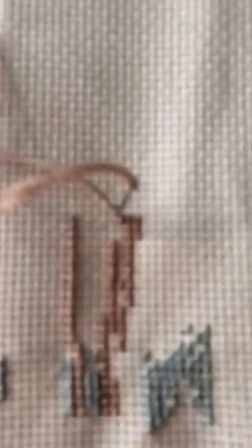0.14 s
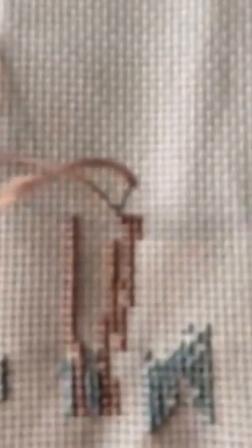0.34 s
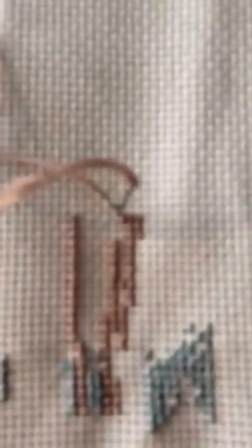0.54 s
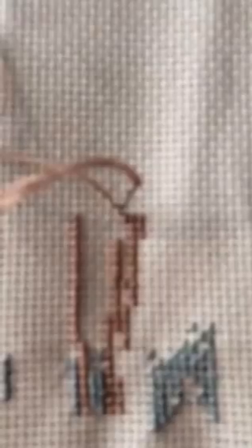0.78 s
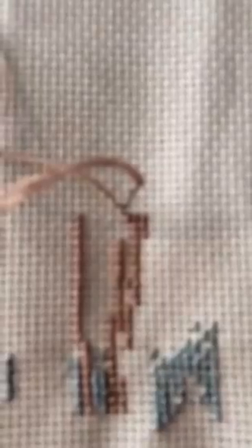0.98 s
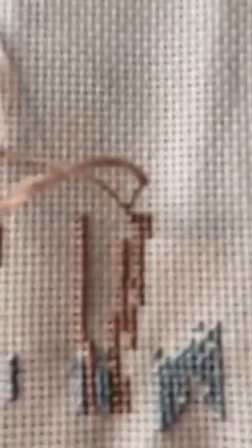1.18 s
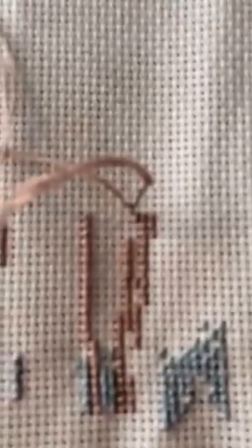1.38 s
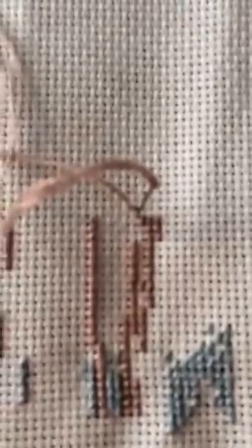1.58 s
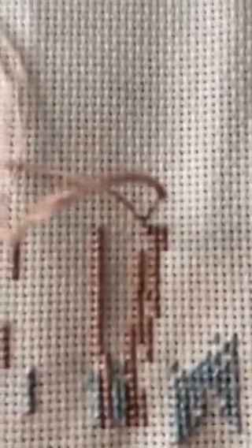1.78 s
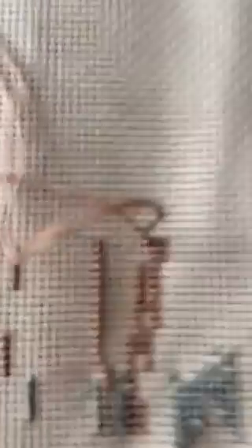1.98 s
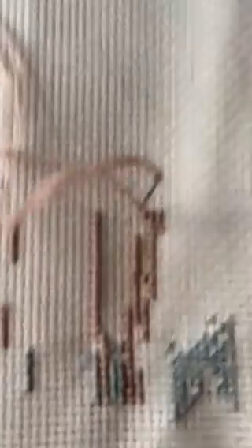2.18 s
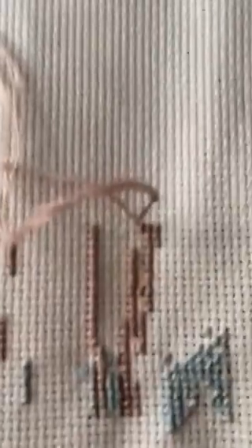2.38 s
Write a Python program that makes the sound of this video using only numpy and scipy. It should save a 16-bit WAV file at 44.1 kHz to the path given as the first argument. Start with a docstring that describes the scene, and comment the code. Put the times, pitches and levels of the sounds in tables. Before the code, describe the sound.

Close to the microphone, embroidery thread is tugged through taut cloth: near-silence, then one loud sharp snap with a very short crackly rasp, a quick small-room echo, and quiet hiss and low rumble again.

```python
"""A quiet room where embroidery floss is tugged through taut cloth, close by.
A faint rustle swells just before the snap of the thread, which snags again as it rasps through the weave:
clicks and bursts of noise make the snags, and uneven slips make the rasp, for under a tenth of a second.
Fading tones are the ringing cloth and frame; a soft low bump is the cloth settling; a light tap, thread
brushes and a short room echo join in, over filtered noise for hiss and rumble and a faint appliance hum."""
import sys
import numpy as np
from scipy import signal
from scipy.fft import rfft, irfft
from scipy.io import wavfile

SR = 44100
rng = np.random.default_rng(int(sys.argv[2]) if len(sys.argv) > 2 else 0)


def dump(signal):
    """Clip the signal to [-1, 1] and save it as 16-bit WAV at the path in sys.argv[1]."""
    limited = np.clip(np.atleast_2d(signal).T, -1, 1)
    pcm = np.round(limited * 32767).astype(np.int16)
    wavfile.write(sys.argv[1], SR, pcm)


N = 107339  # length of the scene in samples

# moments when the thread snags and lets go, the first being the break-free snap; relative levels:
# [t/s, crack level/dB, fizz level/dB, ring level/dB, scatter decay/s]
SNAGS = [(1.9312, -1, -11, 3, 0.0025), (1.9419, -7.5, 0.5, -18.5, 0.0003),
         (1.9476, -23, -17.5, -26.5, .002), (1.9558, -18, -6, -22, .0015),
         (1.9665, -36.5, -18.5, -35.5, 0.0016), (1.9709, -18, -13, -31.5, .0005),
         (1.9735, -30, -19, -26.5, 0.0009), (1.987, -14.5, -13.5, -35.5, 0.00067),
         (2.0037, -16, -30.5, -17.5, 0.0015), (2.0056, -34, -26, -17.5, 0.0012)]


def undb(db):
    """Turn decibels into a gain."""
    return 10 ** (np.asarray(db) / 20)


def unit(x):
    """Scale a sound to an rms (average strength) of 1."""
    return x / np.sqrt(np.mean(x ** 2))


def band(x, lo_hz, hi_hz, order=2):
    """Keep mainly the frequencies between two limits."""
    edges_hz = [lo_hz, min(hi_hz, SR / 2 - 20)]
    return signal.sosfilt(signal.butter(order, edges_hz, "band", fs=SR, output="sos"), x)


def high_pass(x, hz, order=2):
    """Cut the bass."""
    return signal.sosfilt(signal.butter(order, hz, "high", fs=SR, output="sos"), x)


def colour(points, size=4096):
    """Turn a curve of [f/Hz, level/dB] into an impulse response that starts at once."""
    hz, db = np.array(points, float).T
    bins_hz = np.arange(size // 2 + 1) * SR / size
    gain = undb(np.interp(np.log(bins_hz + 1), np.log(hz), db))
    # folding the cepstrum gives minimum phase: nothing sounds before the click
    cepstrum = irfft(np.log(gain))
    cepstrum[1:size // 2] *= 2
    cepstrum[size // 2 + 1:] = 0
    return irfft(np.exp(rfft(cepstrum)))


def through(x, response):
    """Pass a sound through an impulse response."""
    return signal.fftconvolve(x, response)[:len(x)]


def impulse(s):
    """A single click at a given time in seconds."""
    return 1. * (np.arange(N) == int(s * SR))


def snags(t):
    """Each snag lets go with a crack and a brief fizz of fibres, and sets the cloth and frame ringing."""
    # colour of a snag's crack: [f/Hz, relative level/dB]
    crack_curve = [(150, -18.5), (400, -12.5), (900, -3), (2000, -0.5), (2700, -2), (3400, -4),
                   (4300, -6.5), (5200, -0.5), (6800, 3.5), (8000, -3), (10200, -1.5), (13000, -26),
                   (15500, -17.5)]
    crack_gain_db, scatter_db = 5.5, -11
    crack, fizz, push = np.zeros((3, N))
    for s, crack_db, fizz_db, ring_db, decay_s in SNAGS:
        scatter = rng.standard_normal(N) * (t > s) * np.exp(-np.abs(t - s) / decay_s)
        release = impulse(s) + undb(scatter_db) * scatter
        crack += undb(crack_db) * release
        fizz += undb(fizz_db) * release
        push += undb(ring_db) * impulse(s)
    cracks = through(crack, colour(crack_curve))
    flicks = band(fizz, 8700, 11800)  # tiny fibres that flick free
    return undb(crack_gain_db) * (cracks + flicks) + through(push, ringing(rubbed=False))


def rasp(t):
    """Dense uneven slips of thread against weave drive the cloth; a faint noise swells up to the snap."""
    # loudness of the rasp over time, relative to the range levels below:
    # [t/s, low level/dB, lower middle level/dB, upper middle level/dB, treble level/dB]
    rasp_levels = [(1.941, -25, -23.5, -34.0, -28), (1.9445, -29, -21.5, -26.5, -25.5),
                   (1.948, -37.5, -26.5, -28, -27), (1.953, -26.5, -29.0, -38.5, -43.5),
                   (1.956, -30.5, -31.5, -28.5, -25.5), (1.9641, -33.5, -37.5, -37.0, -38),
                   (1.968, -30, -40.5, -35, -35), (1.972, -34.5, -31, -32.0, -27.5),
                   (1.977, -28.5, -31.0, -27.5, -29.5), (1.983, -29.0, -35.0, -41, -43.5),
                   (1.9883, -38, -33, -28.0, -34.5), (1.997, -40, -30.5, -24, -32),
                   (2.002, -47.5, -32.5, -33.5, -31.5), (2.007, -44.5, -34, -25, -43.5),
                   (2.012, -40, -33, -48.5, -40)]
    # those four frequency ranges: [lowest f/Hz, highest f/Hz]
    ranges_hz = [(430, 1500), (1300, 2400), (2400, 4800), (5200, 15500)]
    # overall level of each range: [level/dB]
    range_levels_db = [1.1, 1.9, 2.1, -.5]
    # colour of the rubbing fibres: [f/Hz, relative level/dB]
    fibre_curve = [(300, -0.5), (800, 5), (2200, 8.5), (4000, -4), (6500, 2), (7800, 1), (9600, 7),
                   (11400, 0), (13200, -15), (15200, -3.5)]
    slips_per_s, slip_spread_db, fuzz_db = 1700, 6, -9.5
    attack_s, release_s = .005, .006  # time for 30 dB
    swell_s, swell_db, swell_rise_db_per_s = 1.9, -61.5, 300.5  # start, first level and rise

    is_slip = rng.random(N) < slips_per_s / SR
    slip_gain = undb(slip_spread_db * np.clip(rng.standard_normal(N), -2, 2))
    slips = is_slip * slip_gain * rng.choice([-1, 1], N)
    friction = unit(unit(slips) + undb(fuzz_db) * rng.standard_normal(N))

    body, fibres = ringing(rubbed=True), colour(fibre_curve)
    body[:len(fibres)] += fibres

    times, *levels = np.array(rasp_levels).T
    before = np.maximum(times[0] - t, 0) / attack_s
    after = np.maximum(t - times[-1], 0) / release_s
    edges_db = -30 * (before + after)
    out = np.zeros(N)
    for (lo, hi), db, range_level_db in zip(ranges_hz, levels, range_levels_db):
        part = band(body, lo, hi, order=3)
        loudness = undb(np.interp(t, times, db) + edges_db + range_level_db)
        out += through(friction * loudness, part / np.linalg.norm(part))

    snap_s = SNAGS[0][0]
    swell_age_s = np.clip(t, swell_s, snap_s) - swell_s
    swell = (t > swell_s) * (t < snap_s) * undb(swell_db + swell_rise_db_per_s * swell_age_s)
    soft_body = band(body, 700, 9000)
    return out + through(friction * swell, soft_body / np.linalg.norm(soft_body))


def ringing(rubbed):
    """Response of cloth and frame: fading tones, with neighbours swinging in opposite directions."""
    # ringing tones (modes) of cloth and frame; t60 is the time to fade by 60 dB; relative levels:
    # [f/Hz, t60/s, level when snapped/dB, level when rubbed/dB]
    modes = [(922.5, 0.082, -24.5, -24.5), (1427, 0.06, -30, -39), (1702, 0.039, -33, -30),
             (1994, 0.064, -21.5, -38), (2676, .025, -32.5, -29.5), (2817, .03, -35.5, -26),
             (3110, 0.032, -35, -23), (3247, 0.025, -16, -23.5), (4310, 0.015, -17, -23.5),
             (4601, .025, -24, -28), (6208, 0.038, -11, -30.5), (6720, 0.013, -8.5, -30),
             (193, 0.18, -39, -50.5)]
    t = np.arange(SR // 4) / SR
    out = np.zeros(len(t))
    for k, (hz, t60, snap_db, rub_db) in enumerate(modes):
        gain = (-1) ** k * undb(rub_db if rubbed else snap_db)
        out += gain * np.sin(2 * np.pi * hz * t) * np.exp(-np.log(1000) * t / t60)
    return out


def handling(t):
    """The cloth settles with a low bump; thread brushes it and the frame is tapped lightly."""
    # faint brushes of thread over the cloth, each swelling and fading around its time:
    # [t/s, half-width/s, f/Hz, level/dB]
    brushes = [(0.076, 0.037, 6300, -76.5), (0.51, 0.067, 2200, -79), (2.372, 0.059, 7300, -76),
               (2.33, 0.18, 2800, -78)]
    bump_s, bump_width_s, bump_hz, bump_db = 2.03, .03, 52, -51
    tap_s, tap_decay_s, tap_hz, tap_db = .636, 0.00083, 890, -47.5

    bump_shape = np.exp(-((t - bump_s) / bump_width_s) ** 2)
    out = undb(bump_db) * bump_shape * np.sin(2 * np.pi * bump_hz * (t - bump_s))
    for s, width_s, hz, db in brushes:
        noise = unit(band(rng.standard_normal(N), hz / 1.5, hz * 1.34))
        out += undb(db) * np.exp(-((t - s) / width_s) ** 2) * noise
    age = np.maximum(t - tap_s, 0)
    return out + undb(tap_db) * np.sin(2 * np.pi * tap_hz * age) * np.exp(-age / tap_decay_s)


def room(x):
    """A short diffuse echo, made of fading noise, whose treble dies first."""
    # colour of the echo: [f/Hz, relative level/dB]
    echo_curve = [(100, -4.5), (500, -6.5), (900, -8), (1200, -2), (1650, -3.5), (2400, -5), (3200, -8.5),
                  (3900, -9.5), (4500, -11.5), (5300, -3.5), (6200, -12.5), (7500, -1.5), (10000, -13),
                  (15000, -19)]
    echo_db, gap_s = -17.5, .005
    t60_s, treble_t60_s = .27, 0.22  # time to fade by 60 dB
    t = np.arange(SR // 2) / SR
    low = band(rng.standard_normal(len(t)), 80, 5400)
    high = band(rng.standard_normal(len(t)), 2400, 11000)
    low_tail = low * np.exp(-np.log(1000) * t / t60_s)
    high_tail = high * np.exp(-np.log(1000) * t / treble_t60_s)
    tail = (low_tail + high_tail) * (t > gap_s)
    echo = through(x, tail / np.linalg.norm(tail))
    return undb(echo_db) * through(echo, colour(echo_curve))


def background(t):
    """Filtered noise makes a steady hiss and a low rumble; the rumble and a faint hum slowly ease."""
    # colour of the background noise: [f/Hz, relative level per Hz/dB]
    floor_curve = [(15, -40.5), (25, -14.5), (43, -3.5), (110, -2), (148, -7), (188, -5.5), (274, -9),
                   (313, -13.5), (349, -10), (523, -17), (666, -14), (741, -20), (945, -18), (1240, -24),
                   (3000, -28), (4260, -33), (15500, -39)]
    # appliance hum, levels as at 1.5 s: [f/Hz, level/dB]
    hum_tones = [(120, -71), (348, -76)]
    floor_db, rumble_edge_hz, fade_db_per_s = -62, 200, -1.2
    air = undb(floor_db) * unit(through(rng.standard_normal(N), colour(floor_curve, size=16384)))
    low_pass = signal.butter(2, rumble_edge_hz, fs=SR, output="sos")
    rumble = signal.sosfiltfilt(low_pass, air)
    hiss = air - rumble
    hum = sum(undb(db) * np.sin(2 * np.pi * (hz * t + rng.random())) for hz, db in hum_tones)
    return hiss + (rumble + hum) * undb(fade_db_per_s * (t - 1.5))


def scene():
    """The pull of the thread in its room."""
    t = np.arange(N) / SR
    # below 406 Hz the small patch of cloth radiates little sound
    thread = high_pass(snags(t) + rasp(t), 406)
    return (thread + room(thread) + handling(t) + background(t))[None]


def record(dry):
    """The recorder cuts the deepest rumble, clips at full scale and cuts the top."""
    low_cut_hz, top_hz = 30, 15400
    held = np.clip(high_pass(dry, low_cut_hz), -1, 1)
    return signal.sosfilt(signal.ellip(10, .2, 80, top_hz, fs=SR, output="sos"), held)


dry = scene()
out = record(dry)
dump(out)
```